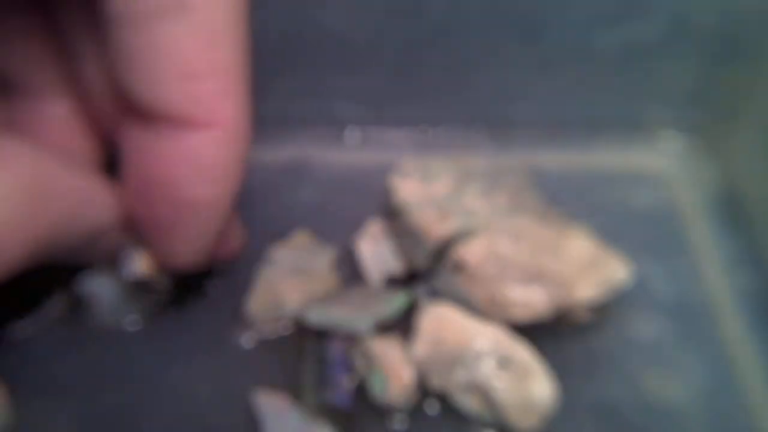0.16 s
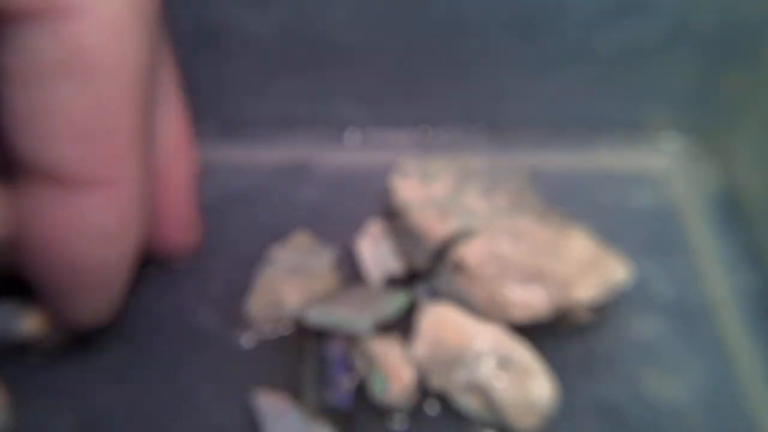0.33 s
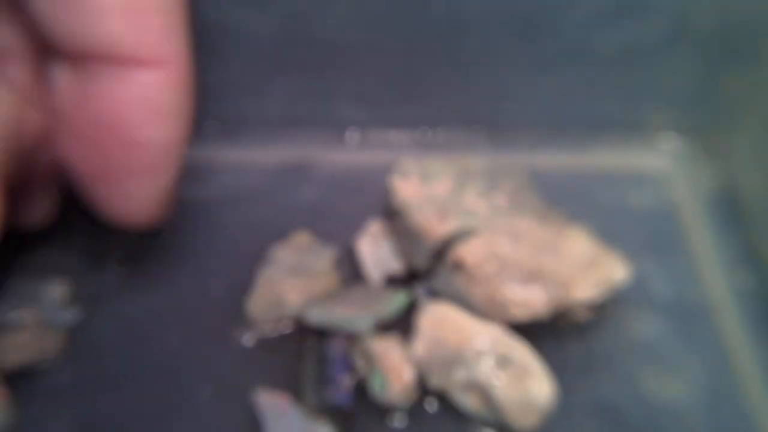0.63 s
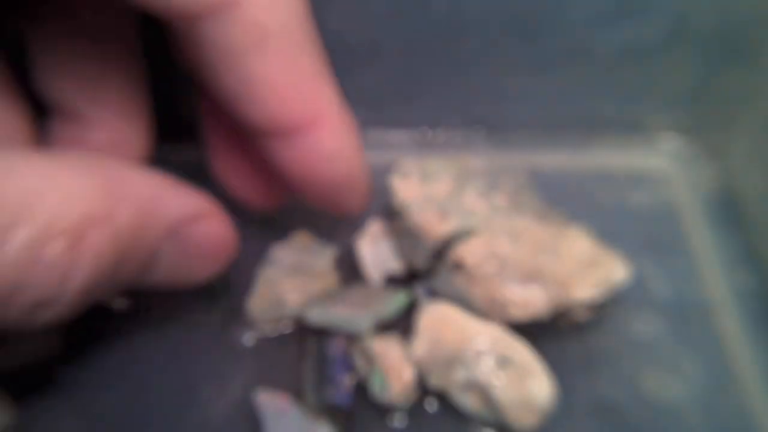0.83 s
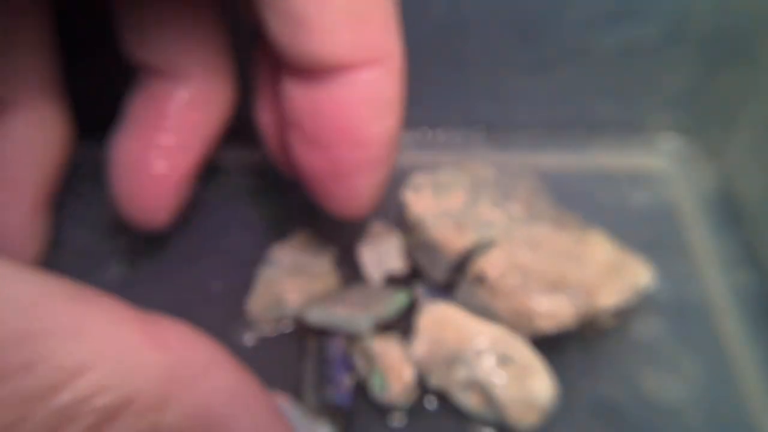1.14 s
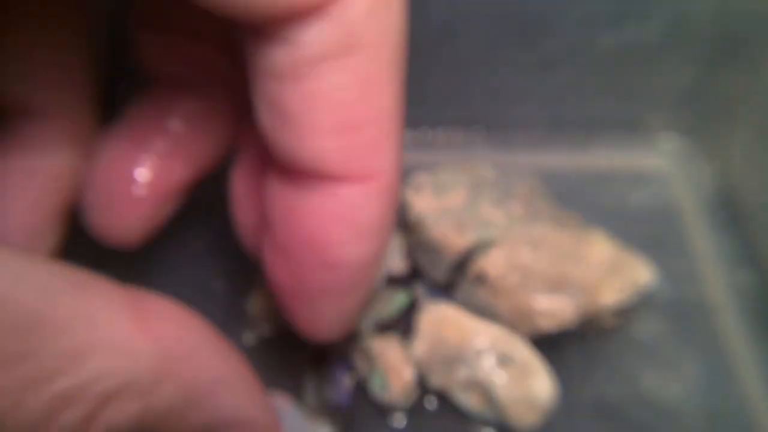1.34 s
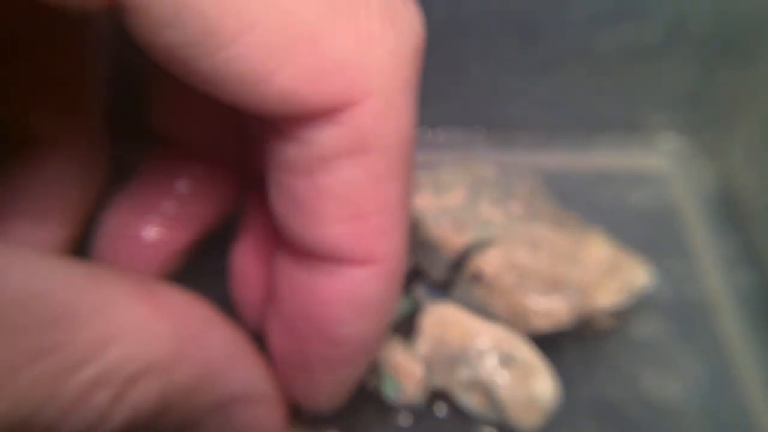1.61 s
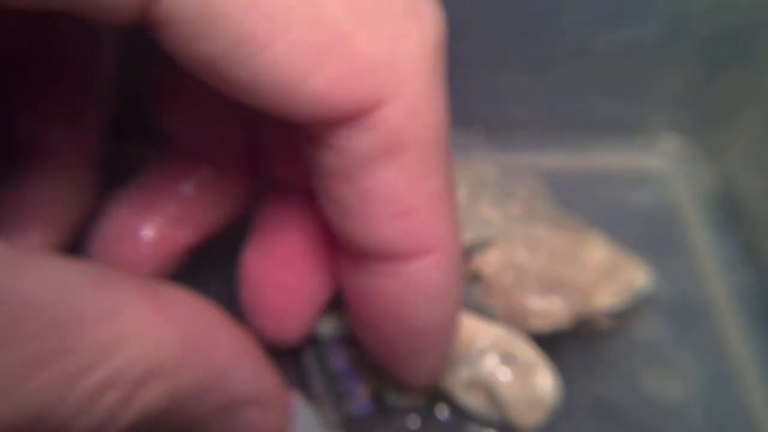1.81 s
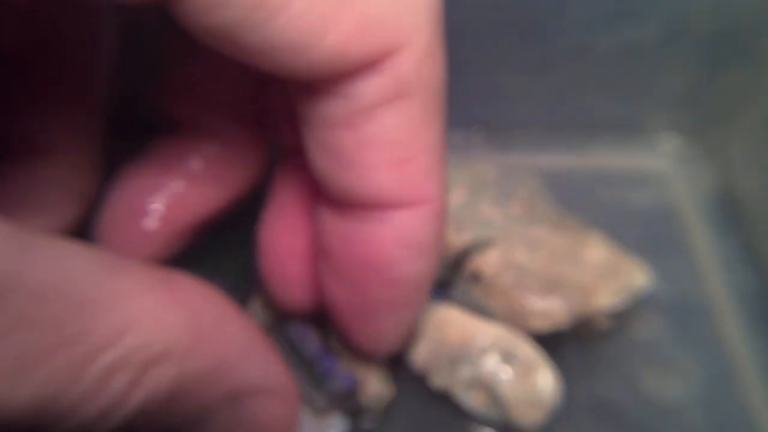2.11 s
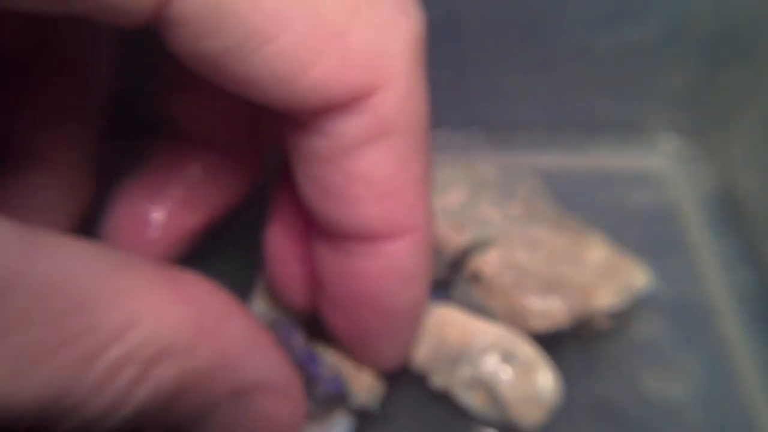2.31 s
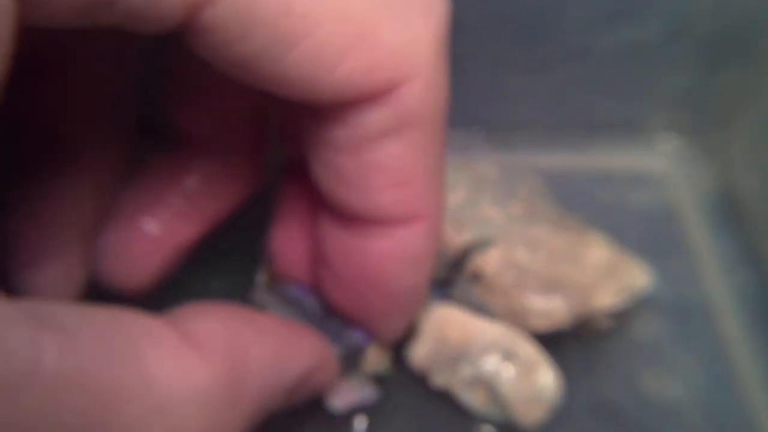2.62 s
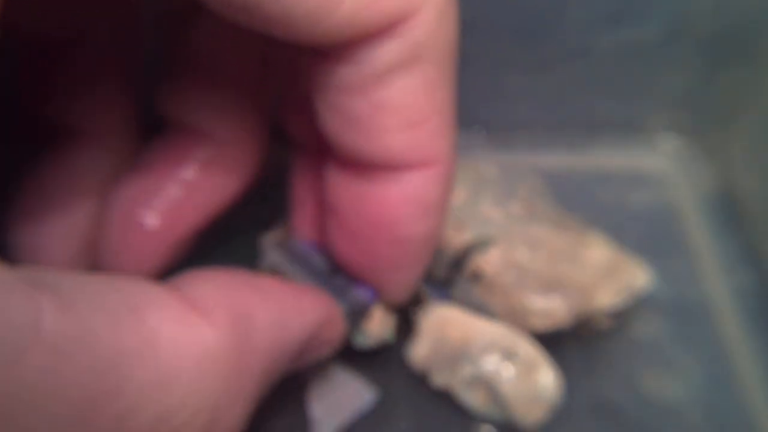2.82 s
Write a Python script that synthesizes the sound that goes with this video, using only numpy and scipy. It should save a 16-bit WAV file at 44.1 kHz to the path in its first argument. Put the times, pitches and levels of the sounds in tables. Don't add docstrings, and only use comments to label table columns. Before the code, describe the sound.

Stones clatter and grind against each other and a hollow plastic tray, close up

```python
import sys
import numpy as np
from scipy import signal
from scipy.fft import rfft, irfft
from scipy.io import wavfile

SR = 44100
rng = np.random.default_rng(int(sys.argv[2]) if len(sys.argv) > 2 else 0)


def magnitude_from_level(level_db):
    exponent = np.asarray(level_db, float) / 20
    return 10 ** exponent


def inscribe(sig):
    pcm = np.round(np.clip(np.atleast_2d(sig).T, -1, 1) * 32767)
    wavfile.write(sys.argv[1], SR, pcm.astype(np.int16))


N = 130095

# (frequency [Hz], density [dB per Hz])
HUSH_SPECTRUM = [(30, 17), (200, 7), (400, 1.5), (790, -4.5), (1040, -19.5), (4000, -25), (16000, -36)]
# (start [s], length [s], drag level [dB], stone-on-stone share [dB])
DRAGS = [(0.106, 0.062, -71, -86), (0.229, 0.15, -44, -25), (0.355, 0.18, -56, -29),
         (0.549, .12, -51.5, -42), (0.791, .13, -62.5, -34), (0.945, 0.16, -52, -41.5),
         (1.087, 0.14, -56.5, -33.5), (1.501, 0.059, -48, -21.5), (1.583, 0.134, -48.5, -18.5),
         (1.634, 0.16, -45.5, -17), (1.811, 0.14, -52, -14.5), (1.889, 0.095, -39.5, -12.5),
         (2.013, 0.071, -36, -17), (2.108, 0.07, -41.5, -26), (2.232, 0.045, -40.5, -24),
         (2.277, 0.052, -44.5, -14.5), (2.328, 0.11, -47, -21.5), (2.441, 0.15, -43, -24.5),
         (2.603, 0.12, -46.5, -30), (2.928, 0.047, -52.5, -20)]
# (centre [s], half width [s], drag level [dB], stone-on-stone share [dB])
SCUFFS = [(0.279, 0.013, -39, -17.5), (0.313, 0.0052, -48, -17), (0.374, 0.0051, -51.5, -21),
          (0.618, 0.0098, -38.5, -24.5), (1.521, 0.013, -45, -22.5), (1.551, 0.0076, -50, -14.5),
          (1.606, 0.009, -51.5, -11), (1.86, 0.0038, -46.5, -17), (1.982, 0.0081, -43, -13.5),
          (2.082, 0.017, -37, -12), (2.189, 0.0039, -42.5, -22), (2.295, 0.017, -37.5, -9.5),
          (2.49, 0.0076, -44.5, -10), (2.595, 0.013, -46, -17.5), (2.675, 0.0057, -52, -26)]
# (time [s], level [dB], upper tray modes [dB],
# stone crack [dB])
KNOCKS = [(0.236, -24, -26.5, -58), (0.249, -26.5, -18.5, -56), (0.275, -22.5, -14.5, -24),
          (0.282, -26, -10, -28), (0.369, -31, -35, -28), (0.404, -21.5, -9.5, -37.5),
          (0.5, -33.5, -13, -28), (0.546, -26, -24, -62), (0.611, -23.5, -19, -50),
          (0.63, -18, -4.5, -18), (0.807, -20, -20, -70), (0.821, -29, -18.5, -49),
          (0.948, -39.5, -18.5, -63), (1.076, -20.5, -20.5, -49), (1.085, -19, -12.5, -29.5),
          (1.522, -39, -0.5, -39), (1.547, -42.5, 1, -26), (1.597, -38.5, -4, -17.5), (1.62, -45, 5, -13),
           (1.651, -27, -7.5, -20.5), (1.686, -20.5, -10.5, -30), (1.701, -25.5, -2.5, -15.5),
           (1.741, -23, -6.5, -9.5), (1.777, -26, -3, -10), (1.896, -21.5, -6, -9.5),
           (1.921, -15, -13, -24), (1.975, -25, -30, -28), (1.984, -29, -22, -12.5), (2.034, -27, -14, -16),
           (2.044, -26.5, -7.5, -17.5), (2.063, -26, -11, -14.5), (2.076, -22.5, -9.5, -16),
           (2.087, -21, -9.5, -31.5),
          (2.13, -26.5, -13, -37), (2.144, -25.5, -15, -25.5), (2.185, -35, -5, -36),
           (2.274, -26, -11.5, -48), (2.281, -21.5, -8, -40), (2.293, -25, -10, -17), (2.31, -34, -1, -25),
           (2.361, -35.5, -3, -38), (2.454, -33.5, 1.5, -22), (2.464, -31, -4.5, -17),
           (2.486, -39.5, 2, -9.5), (2.497, -48, -10, -9.5), (2.583, -33, 0, -44), (2.673, -33, -7.5, -55),
           (2.771, -31, -10.5, -8), (2.881, -44, -28, -18.5),
          (0.151, -58, -22, -62), (0.294, -30, -11, -26), (0.327, -36, -26, -32.5), (0.339, -29, -20, -32.5),
         (0.463, -43, -12, -50.5), (0.58, -37.5, -20, -53), (1.491, -43, -35, -65),
         (1.66, -28, -4.5, -19.5), (1.794, -31, -15, -20), (1.862, -40, 1, -24), (1.946, -42, -24, -19),
         (2.017, -39, -23, -9.5), (2.159, -35, -7, -17.5), (2.193, -36.5, -4, -30.5),
         (2.245, -37, -10, -52), (2.403, -38, -6.5, -41), (2.529, -37, -32, -45), (2.659, -40, -1, -40),
         (2.686, -43, -2.5, -46)]
# (time [s], level [dB])
BUMPS = [
    (0.812, -15.5),
    (0.821, -7.5),
    (1.077, -3.5),
    (1.088, -1.5),
    (1.900, -6.5),
    (1.973, -10.5),
    (2.151, -31),
    (2.586, -10.5),
]
# (frequency [Hz], level [dB], t60 [s])
TRAY_MODES = [(164, -12.5, 0.012), (272.6, -36.5, 0.16), (495, -15, 0.05), (628, -14, 0.022),
              (756, -5, 0.014), (893, 2, 0.022), (920, -7, 0.019), (1346, -4, 0.018), (1732, 0, 0.017),
              (2005, -4.5, 0.019), (2571, -13, 0.028), (3084, -10, 0.022), (3760, -7, 0.03)]
# (frequency [Hz], level [dB], t60 [s])
STONE_MODES = [(4290, 1, 0.0036), (6420, -13.5, 0.0058), (6500, -11.5, 0.0055), (7000, -13, 0.0043),
               (10000, -18, 0.012)]
# (start [s], length [s], air level [dB], left minus right [dB])
HAND_AIR = [
    (0.243, 0.6, -57.5, -3),
    (0.59, 0.056, -49, 1),
    (0.645, 0.14, -57.5, 1.5),
    (0.805, 0.45, -57, -7.5),
    (1.048, 0.28, -63, -11),
    (1.338, 0.52, -69, -14.5),
    (1.894, 0.292, -57.5, -1.5),
    (2.196, 0.27, -66.5, -1),
    (2.485, 0.3, -63.5, 8.5),
]
# (start [s], length [s], frequency [Hz], level [dB])
SQUEAKS = [
    (.25, 0.095, 9200, -78),
    (.268, .03, 7900, -83),
    (0.363, 0.026, 9200, -72),
    (0.815, 0.065, 3720, -79),
    (2.055, 0.036, 6810, -50),
    (2.284, .008, 7700, -54),
    (2.374, 0.012, 9600, -72),
    (2.461, 0.0045, 9950, -56),
    (2.482, 0.011, 1710, -40.5),
    (2.578, 0.014, 10300, -75),
]
# (time [s], frequency [Hz], level [dB], t60 [s])
PEBBLES = [(.405, 902, -17, 0.01), (.631, 2097, -23.5, 0.018), (.501, 1950, -39.5, 0.017),
           (0.951, 2070, -47.5, 0.039), (.957, 3040, -60, 0.052), (0.96, 1330, -44.5, 0.044),
           (1.085, 6760, -39.5, 0.012), (1.984, 11640, -31.5, 0.0084), (2.884, 1547, -43.5, 0.026),
           (2.883, 2990, -42.5, 0.023), (2.885, 2380, -43.5, 0.013), (2.882, 4500, -39.5, 0.011),
           (2.885, 3800, -41.5, 0.02), (2.885, 560, -51.5, 0.066)]
# (start [s], length [s], level [dB])
SKIN = [
    (0.823, 0.395, -62),
    (1.236, 0.15, -67),
]


def unit(x):
    return x / np.sqrt(np.mean(x ** 2))


def band(x, lo_hz, hi_hz):
    return signal.sosfilt(signal.butter(2, [lo_hz, min(hi_hz, 0.45 * SR)], "band", fs=SR, output="sos"), x)


def walk(rate):
    return 1.2 * np.interp(np.arange(N) / SR * rate, np.arange(400), rng.standard_normal(400))


def spikes(times, sizes):
    return np.bincount(np.clip((times * SR).astype(int), 0, N - 1), sizes, N)


def fade(x, time_s):
    return signal.lfilter([1], [1, -np.exp(-1 / (time_s * SR))], x)


def swells(rows, rise_s, fall_s):
    t = np.arange(N) / SR - rows[:, :1]
    return np.clip(t / rise_s, 0, 1) * np.exp(-np.maximum(t - rows[:, 1:2], 0) / fall_s)


def ring(force, hz, db, t60, wander=0.06):
    wander_per_s, port_lag_s, pan_spread_db = 22, 5.5e-5, -0.5
    high = min(hz / 3350, 1)
    step = rng.standard_normal(100)[(np.arange(N) * wander_per_s / SR + rng.random()).astype(int)]
    spin = np.exp(2j * np.pi * hz / SR * np.cumsum(1 + wander * high ** 2 * step))
    z = spin * signal.lfilter([magnitude_from_level(db)], [1, -magnitude_from_level(-60 / t60 / SR)], force / spin)
    turn = 2 * np.pi * hz * port_lag_s + rng.uniform(-np.pi, np.pi) * high ** 3
    pan_db = pan_spread_db * rng.standard_normal() * high
    return np.array([magnitude_from_level(pan_db) * (z * np.exp(-1j * turn)).imag, magnitude_from_level(-pan_db) * z.imag])


def hush():
    hz = np.fft.rfftfreq(N, 1 / SR) + 1
    table_hz, table_db = np.array(HUSH_SPECTRUM).T
    db = np.interp(np.log(hz), np.log(table_hz), table_db)
    noise = irfft(rfft(rng.standard_normal((2, N))) * magnitude_from_level(db), N)
    return unit(noise) * magnitude_from_level(-70 + np.array([[-4], [3]]))


def dragging():
    drag, scuff, t = np.array(DRAGS), np.array(SCUFFS), np.arange(N) / SR
    humps = np.exp(-((t - scuff[:, :1]) / scuff[:, 1:2]) ** 2)
    shape = np.r_[swells(drag, 0.02, 0.016), humps]
    rows = np.r_[drag, scuff]
    grit_per_s, spread_db, flicker_db, grit_db = 2800, 2.5, 1.5, -22
    chance = rng.random((3, N))
    catches = (chance[0] < grit_per_s / SR) * np.sign(chance[1] - 0.5)
    grit = unit(catches * magnitude_from_level(-spread_db * np.log(1 - chance[2])))
    grit = grit * magnitude_from_level(flicker_db * walk(45) + grit_db)

    def rub(share):
        return grit * (magnitude_from_level(rows[:, 2] + share * (rows[:, 3] + 17.5)) @ shape)

    return rub


def knocks():
    chatter_s, chatter_db, contact_s = 0.003, -7.5, 0.001176
    rows = np.array(KNOCKS)
    first = np.zeros(len(rows))
    chance = rng.standard_normal((len(rows), 2, 3))
    late = np.c_[first, chatter_s * np.abs(chance[:, 0]).cumsum(axis=1)]
    loss_db = chatter_db * (1 + late[:, 1:] / chatter_s / 2) + 3 * chance[:, 1]
    db = rows[:, 1:2] + np.c_[first, loss_db]
    at = (rows[:, :1] + late).ravel() + contact_s
    return at, db.ravel(), (db + rows[:, 2:3]).ravel(), (db + rows[:, 3:]).ravel()


def ringing(at, low_db, upper_db, crack_db, rub):
    knock_db, scatter_db = -11.5, 2.5
    thud_hz, upper_hz = 350, 1150
    bump_s, bump_db = np.array(BUMPS).T
    bumps = spikes(bump_s, magnitude_from_level(bump_db + knock_db))
    thud = [m for m in TRAY_MODES if m[0] < thud_hz]
    body = [m for m in TRAY_MODES if thud_hz < m[0] < upper_hz]
    upper = [m for m in TRAY_MODES if m[0] > upper_hz]
    free = [(1070, -1, 0.019)]
    hand_down_s, hand_damp_db = 0.64, -18.5
    hit_damp_db = hand_damp_db * (at > hand_down_s)
    rub_damp_db = hand_damp_db * (np.arange(N) / SR > hand_down_s)
    # (modes, knock level [dB], rubbing force, low edge [Hz], high edge [Hz])
    groups = [(thud, low_db - 5, rub(-0.38) + bumps, 90, 500),
              (body, low_db, rub(0), 300, 990),
              (free, low_db + hit_damp_db, rub(0) * magnitude_from_level(rub_damp_db), 800, 1250),
              (upper, upper_db + 11, rub(0.43) * magnitude_from_level(-2.5), 1200, 4100),
              (STONE_MODES, crack_db + 18, rub(1) * magnitude_from_level(-6.0), 3600, 12000)]
    out = 0
    for modes, hit_db, rubbing, lo_hz, hi_hz in groups:
        rung = 0
        for mode in modes:
            scatter = scatter_db * rng.standard_normal(len(at))
            hits = spikes(at, magnitude_from_level(hit_db + knock_db + scatter))
            rough = rubbing * np.sign(rng.standard_normal(N)) * magnitude_from_level(2.35 * walk(29.77))
            rung = rung + ring(hits + rough, *mode)
        rung = signal.sosfilt(signal.butter(6, 1.02 * hi_hz, fs=SR, output="sos"), rung)
        out = out + band(band(rung, lo_hz, hi_hz), 0.85 * lo_hz, hi_hz)
    return out


def cracks(at, low_db, crack_db, rub):
    crack_level_db, rise_s, fall_s = -1.5, 0.00072, 0.0046
    out = 0
    # (hardness slope, level [dB], low edge [Hz], high edge [Hz])
    for slope, db, lo_hz, hi_hz in ((0, 1.5, 2490.5, 7507), (1, -3, 7500, 14000)):
        hardness_db = slope * (crack_db - low_db + 6.0)
        burst = fade(spikes(at, magnitude_from_level(crack_db + crack_level_db + hardness_db)), fall_s)
        burst = fade(burst, rise_s) / (rise_s * SR)
        burst = burst + np.sqrt(fade(rub(1 + slope) ** 2, fall_s)) * magnitude_from_level(-29.0)
        noise = rng.standard_normal((3, N))
        ports = 0.66 * noise[0] * np.array([[1], [-1]]) + noise[1:]
        out = out + magnitude_from_level(db) * band(burst * ports, lo_hz, hi_hz)
    return out


def stones():
    at, low_db, upper_db, crack_db = knocks()
    rub = dragging()
    return ringing(at, low_db, upper_db, crack_db, rub) + cracks(at, low_db, crack_db, rub)


def room(near):
    t60_s, tail_db = 0.25, -18
    t = np.arange(SR // 2) / SR
    mid, side = rng.standard_normal((2, len(t)))
    tail = band(mid + band(side, 1400, 16000) * np.array([[1], [-1]]), 170, 10000)
    tail = tail * magnitude_from_level(-60 * t / t60_s) * np.minimum(t / 0.0054, 1)
    tail = tail / np.sqrt(np.sum(tail ** 2) / 2)
    return magnitude_from_level(tail_db) * signal.fftconvolve(near, tail, axes=1)[:, :N]


def hand_air():
    air_hz, air_db = 55.6, -1
    air = np.array(HAND_AIR)
    port_db = air[:, 2] + air_db + air[:, 3] * np.array([[0.5], [-0.5]])
    gain = magnitude_from_level(port_db) @ swells(air, 0.008, 0.013)
    noise = rng.standard_normal((3, N))
    puff = unit(band(band(noise[1:] + 1.7 * noise[0], 21.8, air_hz), 9, 2.3 * air_hz))
    return puff * gain * magnitude_from_level(1.8 * walk(11.24))


def squeaks():
    width = 0.038
    rows, out = np.array(SQUEAKS), 0
    for (_, _, hz, db), shape in zip(rows, swells(rows, 0.004, 0.0076)):
        noise = rng.standard_normal((3, N))
        edge = band(noise[0] + noise[1:], hz * (1 - width), hz * (1 + width))
        out = out + unit(edge) * shape * magnitude_from_level(db)
    return out


def pebbles():
    out = 0
    for s, hz, db, t60 in PEBBLES:
        ping = ring(spikes(np.array([s]), [1.0]), hz, db, t60, wander=0)
        out = out + band(band(ping, 0.77 * hz, 1.4 * hz), 0.64 * hz, 1.3 * hz)
    return out


def swing():
    start_s, hz, t60_s, level_db, pan_db = 0.566, 56, 0.4, -39, -18
    t = np.maximum(np.arange(N) / SR - start_s, 0)
    turn = 2 * np.pi * hz * t * (1 - t)
    port_db = level_db - 60 * t / t60_s + pan_db * np.array([[0.5], [-0.5]])
    return -(np.sin(turn) + 0.41 * np.sin(2 * turn)) * magnitude_from_level(port_db)


def skin():
    rows = np.array(SKIN)
    dull = signal.butter(4, [220, 980], "band", fs=SR, output="sos")
    hiss = unit(signal.sosfilt(dull, rng.standard_normal(N)))
    return hiss * magnitude_from_level(1.2 * walk(30)) * (magnitude_from_level(rows[:, 2]) @ swells(rows, 0.02, 0.016))


def scene():
    near = stones() + squeaks() + pebbles() + skin()
    return near + room(near) + hand_air() + swing() + hush()


def roll_off(x):
    return signal.sosfilt(signal.butter(12, 16490, fs=SR, output="sos"), x)


def record(dry):
    return roll_off(dry)


dry = scene()
out = record(dry)
inscribe(out)
```